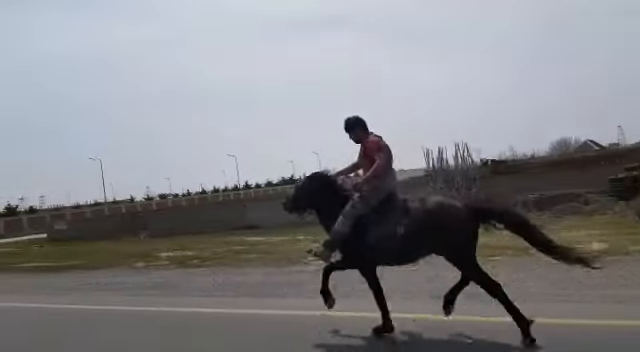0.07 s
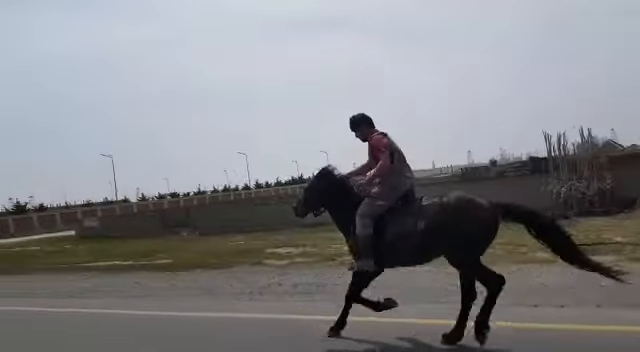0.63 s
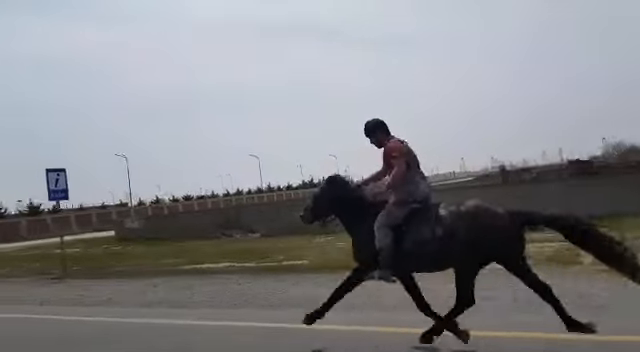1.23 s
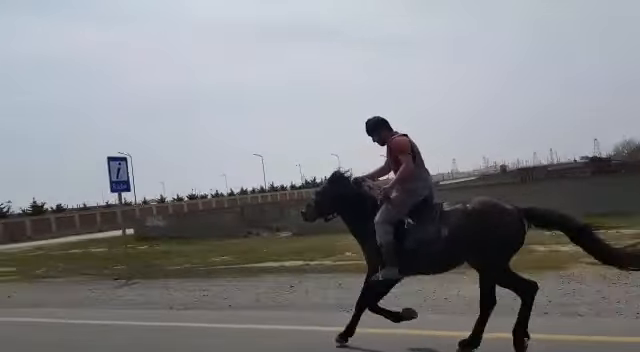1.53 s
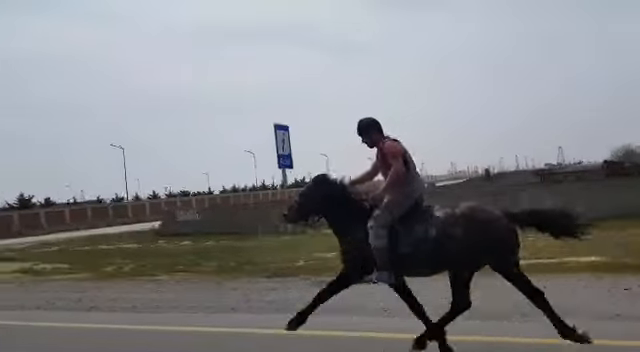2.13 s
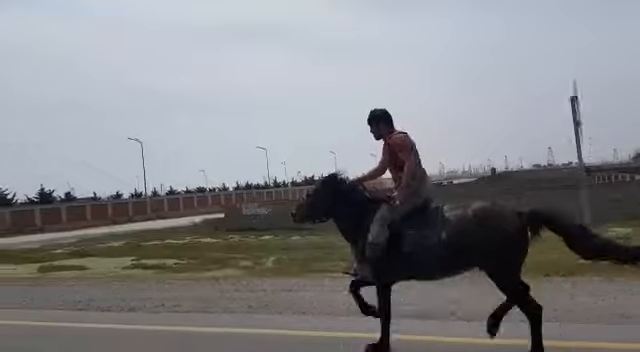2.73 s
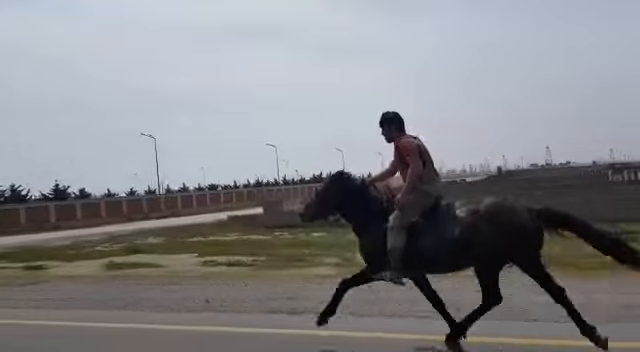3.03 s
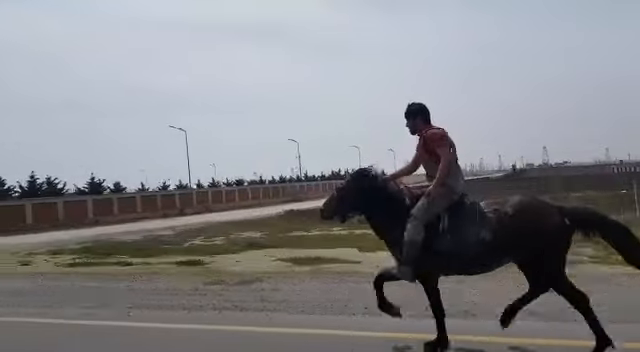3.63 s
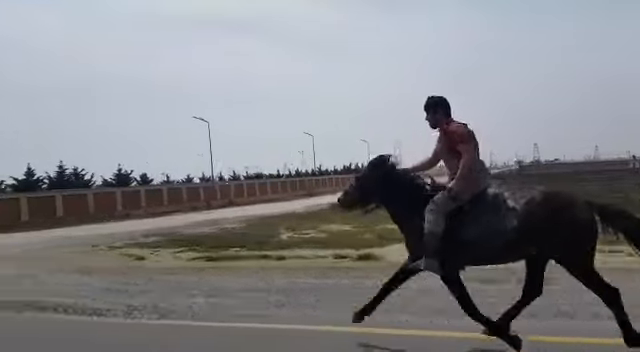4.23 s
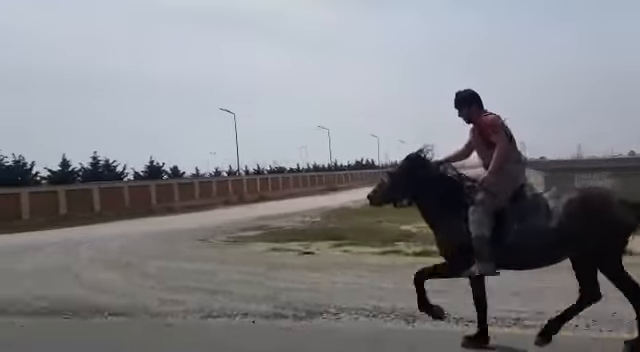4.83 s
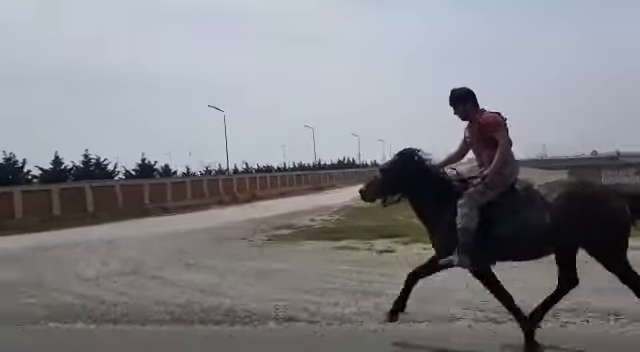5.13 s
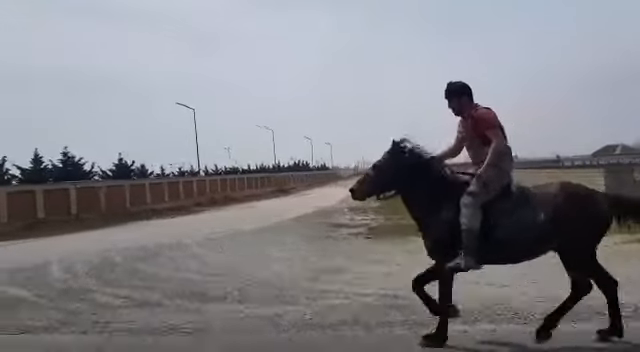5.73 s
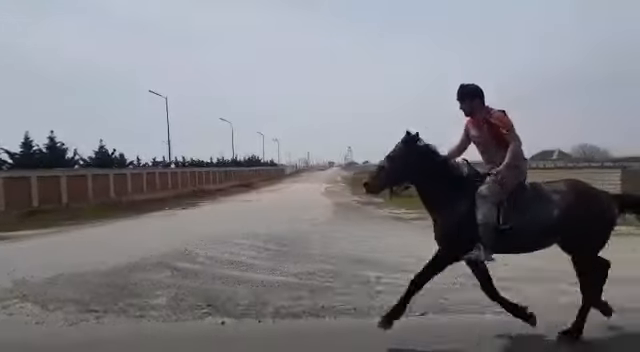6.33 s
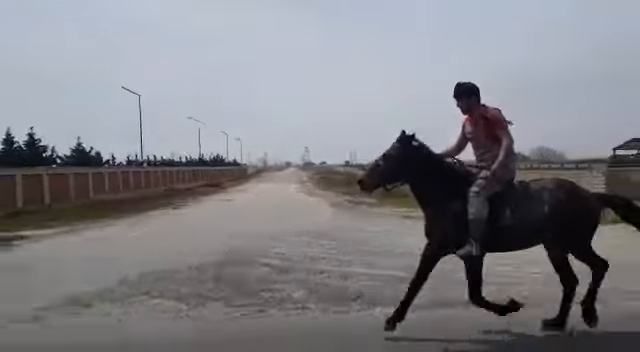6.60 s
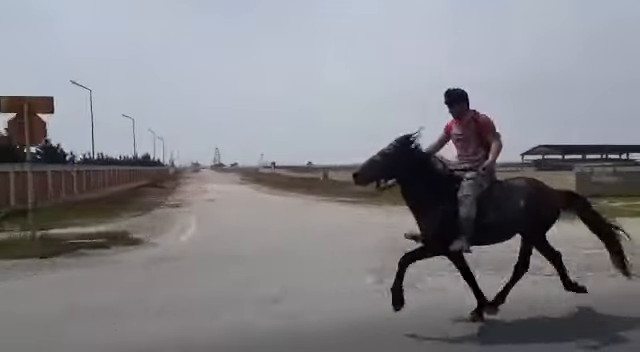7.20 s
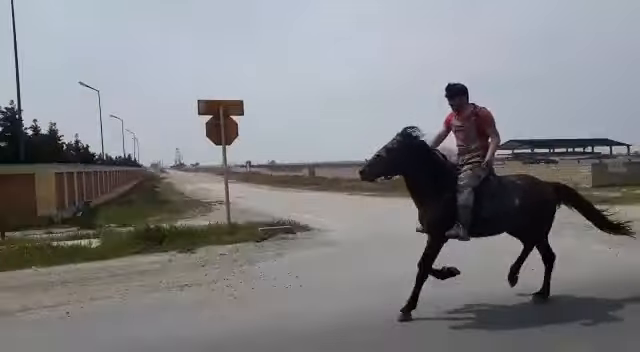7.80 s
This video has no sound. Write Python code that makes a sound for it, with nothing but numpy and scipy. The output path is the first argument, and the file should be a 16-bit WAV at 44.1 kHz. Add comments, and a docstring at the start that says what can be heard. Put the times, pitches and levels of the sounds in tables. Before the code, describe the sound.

Wind buffets the microphone of a moving vehicle while a horse's hooves clack quickly along a hard road beside it.

```python
"""A trotting horse in the wind

A horse trots fast on asphalt, heard from a vehicle that keeps pace beside it. Its hooves land in
diagonal pairs, each with a clack and a gritty scrape; some skid or clink on a stone. Rushing air hits
the microphone's two openings (ports) in gusts, swirls and short rasps. Underneath, the tyres hiss."""
import sys
import numpy as np
from scipy import signal
from scipy.fft import rfft, irfft, next_fast_len
from scipy.io import wavfile
from scipy.ndimage import map_coordinates

SR = 44100
rng = np.random.default_rng(int(sys.argv[2]) if len(sys.argv) > 2 else 0)


def dump_mix(stems):
    """Bounce the given channels to the path in sys.argv[1] as a 16-bit WAV at rate SR."""
    frames = np.atleast_2d(stems).T  # one column per channel
    limited = np.clip(frames, -1, 1)  # hard clip at full scale
    pcm = np.round(limited * 32767).astype(np.int16)
    wavfile.write(sys.argv[1], SR, pcm)


N = 351036
TIME = np.arange(N) / SR
PORT_LEAD_S = 0.000776  # the left port hears the horse first
SHELTER_DB = -6.5  # the right port is sheltered from buffets and the strongest rasps


def amp(db):
    """Turn decibels into a gain."""
    return 10 ** (np.asarray(db) / 20)

def unit(x):
    """Scale to an average power of 1."""
    return x / np.sqrt(np.mean(x ** 2) + 1e-20)

def curve(rows):
    """Join (time, value) points with straight lines."""
    return np.interp(TIME, *np.transpose(rows))

def add(track, s, sound):
    """Mix a sound into a track, starting at s seconds."""
    track[..., round(s * SR):][..., :sound.shape[-1]] += sound

def fade(t, fade_s):
    """A gain that falls by 60 dB every fade_s seconds."""
    return amp(-60 * t / fade_s)

def ping(hz, fade_s, t):
    """A pure tone that dies away."""
    return np.sin(2 * np.pi * hz * t) * fade(t, fade_s)

def wobble(rate):
    """A smooth curve through `rate` random values a second."""
    return map_coordinates(rng.standard_normal(int(N * rate / SR) + 4), [TIME * rate])

def per_port(rate):
    """A separate wobble for each port."""
    return np.array([wobble(rate), wobble(rate)])

def surge(rate):
    """A wobble for each port, with deep dips and gentle peaks."""
    w = per_port(rate)
    return np.where(w > 0, np.tanh(w), w)

def jitter(count, rate):
    """Samples that jump to a new random value about `rate` times a second."""
    return np.repeat(rng.standard_normal(count), SR // rate)[:count]

def burst(swell_s, rough_db):
    """Ragged noise that swells and dies away."""
    age = np.arange(SR // 6) / SR / swell_s
    ragged = amp(rough_db * np.clip(jitter(len(age), 1500), -2, 1.5))
    return age * np.exp(1 - age) * unit(rng.standard_normal(len(age)) * ragged)

def pops(rate, spread_db):
    """Random clicks of uneven size at each port."""
    hit = rng.random((2, N)) < rate / SR
    return unit(hit * rng.standard_normal((2, N)) * amp(spread_db * rng.uniform(-0.75, 1, (2, N))))

def grains(rate, hz, scatter, cycles, spread_db):
    """A loose stream of tiny tones at each port, each with its own pitch and size."""
    count = int(2 * N * rate / SR)
    late, phase = rng.random((count, 2)).T[..., None]
    pitch, size = np.clip(rng.standard_normal((count, 2)), -2, 2).T[..., None]
    grain_hz = hz * np.exp(scatter * pitch)
    samples = np.arange(int(cycles * SR / grain_hz.min()))
    turns = samples * grain_hz / SR
    swell = np.sin(np.pi * np.minimum(turns / cycles, 1)) ** 2
    wave = amp(spread_db * size) * swell * np.sin(2 * np.pi * (turns + phase))
    start = ((np.arange(count)[:, None] + 2 * late) * SR / rate).astype(int)
    places = (start + samples) % (2 * N)
    return unit(np.bincount(places.ravel(), wave.ravel(), 2 * N).reshape(2, N))

def filtered(x, response):
    """Pass x through a filter, given as a function of frequency."""
    size = next_fast_len(N + 8192, real=True)
    return irfft(rfft(x, size) * response(np.fft.rfftfreq(size, 1 / SR)), size)[..., :N]

def colour(points):
    """A filter that shapes the tone along (frequency, level) points."""
    def response(hz):
        point_hz, db = np.transpose(points)
        gain = unit(amp(np.interp(np.log(hz + 1), np.log(point_hz), db)))
        cepstrum = irfft(np.log(gain + 1e-6))
        half = len(cepstrum) // 2
        cepstrum[1:half] *= 2  # folded so the filter rings after a hit, never before
        cepstrum[half + 1:] = 0
        return np.exp(rfft(cepstrum))
    return response


# How loud the tyres are: (time [s], level [dB])
TYRE_LEVEL = [(0, -76), (1.1, -59.5), (1.6, -78), (3, -73), (3.85, -65.5), (4.25, -64), (6.1, -58.5),
              (6.75, -68.5), (7.2, -58.5), (7.65, -63.5), (7.96, -53)]
# Tone of their hiss: (frequency [Hz], level [dB])
TYRE_TONE = [(60, 30), (300, 10), (800, 27), (1600, 21), (3000, 10), (4800, 2.5), (6600, 1), (8100, -9),
             (9500, -8), (11300, -3), (15500, -6)]
def tyres():
    """Tyres hiss on the asphalt while sand crackles under them."""
    level_db = curve(TYRE_LEVEL)
    rolling = rng.standard_normal((2, N)) * amp(2.6 * per_port(32) + 1.1 * per_port(900))
    hiss = unit(filtered(rolling, colour(TYRE_TONE)))
    sand = grains(rate=420, hz=2500, scatter=0.34, cycles=2.5, spread_db=-1.5)
    return amp(level_db + 20) * hiss + amp(level_db - 13.5) * sand


# Gusts of air: (time [s], strength [dB])
GUSTS = [(0.0, -22.5), (0.08, -17), (0.19, -16), (0.39, -20.5), (0.48, -13.5), (0.55, -19), (0.64, -29.5),
         (0.69, -21.5), (0.8, -14.5), (0.89, -15), (1.0, -15), (1.13, -14), (1.28, -18), (1.34, -16.5),
         (1.42, -14.5), (1.5, -20), (1.56, -17.5), (1.67, -21), (1.75, -16.5), (1.93, -17), (1.98, -20.5),
         (2.04, -17), (2.085, -18), (2.12, -17.5), (2.28, -14.5), (2.33, -20), (2.39, -15.5), (2.84, -17),
         (3.05, -19), (3.33, -24), (3.38, -19), (3.46, -18.5), (3.5, -26.5), (3.54, -21), (3.7, -19),
         (3.76, -23), (4.53, -23.5), (4.59, -29.5), (4.65, -23.5), (4.8, -28), (4.88, -27), (4.97, -24),
         (5.07, -21), (5.12, -28.5), (5.15, -26), (5.3, -24), (5.33, -29.5), (5.43, -19.5), (5.54, -28),
         (5.66, -21.5), (5.87, -23.5), (6.21, -25), (6.29, -24.5), (6.48, -23.5), (6.63, -30),
         (6.72, -23.5), (6.75, -36), (6.81, -20.5), (6.85, -39), (6.87, -26.0), (7.02, -21.5), (7.05, -32),
         (7.17, -19), (7.2, -26.5), (7.29, -21), (7.39, -19.5), (7.41, -18), (7.53, -19.5), (7.56, -17.5),
         (7.68, -33), (7.81, -38), (7.87, -31.5), (7.96, -41.5)]
# Which port gets more wind: (time [s], left over right [dB])
WIND_SIDE = [(0, 0), (1.3, 2), (3.5, 1), (4.25, 7), (5.3, 0), (5.7, 7.5), (6.9, 4.5), (7.05, 4), (7.96, 3)]
def airstream():
    """Gust strength above a plain breeze, and how far the wind leans left, both in dB."""
    breeze_db = -21
    return curve(GUSTS) - breeze_db, curve(WIND_SIDE)


# How loud the rumble is, before gusts add to it: (time [s], level [dB])
RUMBLE_LEVEL = [(0.0, -30.5), (0.55, -29), (0.95, -33.5), (1.12, -31.5), (2.2, -31.5), (3.4, -32.5),
                (4.0, -36.5), (4.4, -37), (4.7, -41.5), (4.95, -31.5), (5.55, -33.5), (6.3, -35.5),
                (6.47, -31.5), (6.75, -35.5), (7.05, -30), (7.55, -28.5), (7.7, -36.5), (7.95, -44)]
# Faster air breaks into smaller swirls: (time [s], high roar over low roar [dB])
AIR_SPEED = [(0, -0.5), (3, 1.5), (4.6, -2.5), (6.5, -7), (7.96, -3.5)]
# Tones of the swirls, from biggest to smallest: (frequency [Hz], level [dB])
RUMBLE_TONE = [(12, -42.5), (28, -21), (42, -10), (70, -5.5), (120, -1.5), (180, -0.5), (230, -2.5),
               (330, -54), (600, -77)]
LOW_ROAR_TONE = [(110, -36), (180, -11), (240, 0.5), (370, 0), (520, -10), (750, -28), (1500, -64)]
HIGH_ROAR_TONE = [(250, -25), (450, 0.5), (560, 0), (730, -0.5), (900, -8), (1200, -25), (2500, -49),
                  (5000, -86)]
FLUTTER_TONE = [(300, -10), (700, 2.5), (1050, 6.5), (1700, -2), (2500, -6.5), (3300, -14), (4700, -25.5),
                (6200, -27), (7000, -37), (8000, -55), (9800, -55), (11500, -36.5), (13500, -55.5),
                (16000, -66)]
def wind():
    """Swirls of air break on each port: big ones rumble, middling ones roar, small ones flutter."""
    gust_db, left_db = airstream()
    speed_db = curve(AIR_SPEED)
    swell_db = 0.81 * wobble(14)  # brief swells within a gust
    puffs, swirls, spits = surge(45), surge(130), per_port(500)
    clicks = pops(rate=280, spread_db=-2.0)  # each is a thud and a crackle at once

    def air(tone, wobble_db, click_gain):
        noise = rng.standard_normal((2, N)) + click_gain * clicks
        return unit(filtered(noise * amp(wobble_db), colour(tone)))

    rumble = air(RUMBLE_TONE, 2.0 * wobble(12) + 1.6 * swirls, click_gain=0.18)
    rumble *= amp(curve(RUMBLE_LEVEL) + 3 + 0.078 * gust_db)
    low = air(LOW_ROAR_TONE, swell_db + puffs + 4.2 * swirls, click_gain=0.47)
    high = air(HIGH_ROAR_TONE, swell_db + 1.2 * puffs + 6.7 * swirls + 1.6 * spits, click_gain=0.44)
    blend = (low + amp(speed_db) * high) / np.hypot(1, amp(speed_db))
    hoots = grains(rate=55, hz=418.5, scatter=0.3263, cycles=6.1, spread_db=1.5)
    roar = amp(gust_db - 23.5) * (blend + amp(-2.5) * hoots)
    growth = 1.61  # dB per dB of gust: small swirls grow fastest
    flutter = air(FLUTTER_TONE, growth * swell_db + 2.5 * puffs + 4 * swirls + 2 * spits, click_gain=0.41)
    flutter *= amp(-35 + growth * gust_db + 0.052 * speed_db)
    return (rumble + roar + flutter) * amp(np.array([left_db, -left_db]) / 2)


# The strongest rasps of air: (time [s], level [dB], swell time [s])
STRONG_RASPS = [(0.075, -27, .002), (0.483, -15.5, .002), (0.518, -16.5, 0.0013), (0.716, -23, .002),
                (0.778, -32, 0.0016), (1.13, -16, 0.0029), (1.331, -19, .003), (1.41, -26, 0.0016),
                (1.517, -21.5, .002), (2.02, -18, 0.0024), (2.035, -23, 0.0018), (2.11, -18, 0.004),
                (2.12, -14, 0.0023), (2.201, -22, 0.0018), (2.543, -19.5, .002), (2.838, -20, 0.0023),
                (3.051, -22.5, 0.003), (3.098, -28, 0.0023), (3.238, -19.5, 0.0027), (3.535, -33, 0.0013)]
# Tone of a rasp: (frequency [Hz], level [dB])
RASP_TONE = [(200, -17), (400, 7.5), (700, 2), (1100, 5.5), (1700, -0.5), (2600, 0), (3400, -11),
             (4700, -24.5), (6200, -23), (7500, -46), (9500, -45), (11300, -33), (15000, -55)]
def rasps(per_second=34, usual_swell_s=0.002, spread_db=4.5):
    """Air tears hardest at the left port; lesser rasps hit either port at random, louder in a gust."""
    gust_db, left_db = airstream()
    tears = [(s, db + port * SHELTER_DB, swell_s, port)
             for s, db, swell_s in STRONG_RASPS for port in range(2)]
    for when, size, length, side in rng.random((int(per_second * N / SR), 4)):
        at, port = int(when * N), int(2 * side)
        db = -29.5 + 1.15 * gust_db[at] + spread_db * (2 * size - 1) + (0.5 - port) * left_db[at]
        tears.append((at / SR, db, usual_swell_s * 2 ** (2 * length - 1), port))
    track = np.zeros((2, N + SR))
    for s, db, swell_s, port in tears:
        add(track[port], s, amp(db) * burst(swell_s, rough_db=8.0))
    return filtered(track[:, :N], colour(RASP_TONE))


# Single hard swirls of air: (time [s], level [dB], pitch [Hz])
AIR_SLAPS = [(0.438, -8, 513), (0.473, -25, 480), (0.514, -9, 600), (0.714, -3.5, 840), (0.721, 1.5, 368),
             (0.78, -8, 410), (0.802, -5, 450), (0.837, -3.5, 626), (1.326, -9, 570), (1.388, -9.5, 435),
             (1.408, -10, 245), (1.746, -7, 440), (1.887, -6, 460), (2.11, -6, 460), (2.121, -5.5, 315),
             (2.761, -6.5, 462), (2.804, -6.5, 378), (3.052, -9.5, 500), (3.098, -19, 334),
             (3.29, -10, 282), (3.534, -7, 274), (4.864, -10.5, 263), (7.007, -6.5, 247), (7.16, -9, 280),
             (7.411, -8, 423)]
# Tone of their slap: (frequency [Hz], level [dB])
SLAP_TONE = [(60, -26), (200, 6.5), (450, 3), (750, 6), (1300, -13), (2500, -26), (4500, -45), (8000, -61)]
def buffets():
    """A hard swirl slaps the left port, spins briefly at its own pitch and only brushes the right."""
    t = np.arange(SR // 20) / SR
    slaps, spins = np.zeros((2, 2, N + SR))
    for s, db, hz in AIR_SLAPS:
        for port in range(2):
            slap = 0.24 * rng.standard_normal(len(t)) * fade(t, 0.017)  # its wake
            slap[SR // 1000 + port * SR // 2000] -= 1  # suction passes from port to port
            port_db = db + port * SHELTER_DB
            add(slaps[port], s, amp(port_db + 12) * slap)
            add(spins[port], s, amp(port_db - 1) * ping(hz, 13 / hz, t))
    return filtered(slaps[:, :N], colour(SLAP_TONE)) + spins[:, :N]


def roadside_echo(x, fade_s):
    """Sound scatters thinly off the vehicle and the edge of the road."""
    t = np.arange(SR // 3) / SR
    tail = rng.standard_normal((2, len(t))) * fade(t, fade_s) * (t > 0.004)
    return signal.fftconvolve(x, tail / np.linalg.norm(tail[0]), axes=1)[:, :N]


# Flung pebbles: (time [s], level [dB])
PEBBLE_TICKS = [(3.6396, -41), (3.9107, -32), (4.575, -32), (4.6314, -33), (5.061, -35.5), (5.753, -31),
                (5.786, -33), (5.847, -32), (5.893, -27), (6.085, -31)]
def pebbles():
    """Loose stones tick on the asphalt, each at a few pitches of its own."""
    t = np.arange(SR // 50) / SR
    track = np.zeros((2, N + SR))
    for s, db in PEBBLE_TICKS:
        hz = 4600 * np.exp(0.22 * rng.uniform(-5, 1, (2, 4, 1)))
        add(track, s, amp(db - 6.5) * ping(hz, 0.0086, t).sum(axis=1))
    return track[:, :N]


# A shoe meets a stone: (time [s], level [dB], pitch [Hz])
SHOE_CLINKS = [(4.333, -34, 5800), (4.7595, -24.5, 6400), (5.2435, -26, 6030), (5.657, -31.5, 6800),
               (7.059, -33, 6840), (7.121, -35, 6130)]
def clinks():
    """A steel shoe catches a stone and rings."""
    t = np.arange(SR // 20) / SR
    track = np.zeros((2, N + SR))
    for port, side in enumerate((1, -1)):
        for s, db, hz in SHOE_CLINKS:
            add(track[port], s - side * PORT_LEAD_S / 2, amp(db) * ping(hz, 0.024, t))
    return track[:, :N]


# A planted hoof drags: (time [s], level [dB], swell time [s])
HOOF_DRAGS = [(4.326, -29, 0.0098), (5.221, -24, 0.0029), (5.433, -30, 0.0058), (5.471, -31.5, 0.0047),
              (6.11, -28, .008), (6.166, -26, 0.0079), (6.226, -33.5, 0.011), (6.325, -33, 0.014),
              (6.404, -32, 0.0051), (6.461, -42, 0.0098), (6.553, -41, 0.0068), (6.638, -37, 0.0043)]
# Tone of a skid: (frequency [Hz], level [dB])
SKID_TONE = [(500, -16), (1200, 16), (2100, 5), (3000, 2.5), (4500, -10.5), (6300, -11.5), (7500, -29),
             (8500, -36), (11000, -36), (15500, -26)]
def skids():
    """Loose grit grinds under a dragging hoof."""
    track = np.zeros((2, N + SR))
    for port, side in enumerate((1, -1)):
        for s, db, swell_s in HOOF_DRAGS:
            add(track[port], s - side * PORT_LEAD_S / 2, amp(db + side) * burst(swell_s, rough_db=5))
    return filtered(track[:, :N], colour(SKID_TONE))


# The trot, one diagonal pair of hooves a row: (time [s], second hoof's delay [s], first level [dB],
# second level [dB], first hollowness [dB], second hollowness [dB], first pitch [Hz],
# second pitch [Hz], extra grit [dB])
TROT = [(0.2165, 0.016, -41, -37.5, -1, 6, 1480, 1370, -6.5),
        (0.4228, 0.016, -25, -33, -1, 1, 1480, 1380, -4),
        (0.668, 0.018, -26.5, -27, -5.5, -7, 1800, 1540, -6),
        (.91, 0.007, -25.5, -39, 0, 1, 1510, 1400, -3),
        (1.1415, 0.013, -28.5, -41.5, 1, 15.5, 1520, 1380, 2),
        (1.3252, 0.035, -39, -35, 13, 6, 1390, 1280, 1),
        (1.5932, 0.0053, -23, -59, 2, -4, 1890, 1400, -13.5),
        (1.789, 0.06, -32, -34, -1, -4, 1500, 1400, -7),
        (2.026, 0.0082, -26, -31, 0, -0.5, 2340, 1450, -4.5),
        (2.245, 0.015, -30, -39, 3, 7, 1500, 1430, -2),
        (2.48, 0.037, -33.5, -39.5, 9, 11.5, 1560, 1400, -1),
        (2.7141, 0.0099, -27.5, -34, 6, 1, 1520, 1400, -2.5),
        (2.9396, 0.024, -25, -30.5, 1, 8.5, 1560, 1456, -4),
        (3.172, 0.0098, -51, -53, -4, -2, 1500, 1400, 0), (3.3928, 0.025, -20, -29, 5, 4, 1780, 2450, 0),
        (3.8487, 0.025, -5.5, -13, -15, -15, 2320, 2400, -10.5),
        (4.056, 0.042, -29, -25, -4.5, -4.5, 1500, 1420, -5),
        (4.307, 0.018, -31.5, -18.5, 3.5, 0.5, 1510, 1880, 1),
        (4.503, .045, -25.5, -26.5, -1, -1.5, 1530, 2450, 1),
        (4.7585, 0.023, -6.5, -16.5, -11, 1.5, 1960, 1940, -1),
        (4.963, 0.049, -31.5, -27.5, -8, 0, 1420, 1120, 0),
        (5.2139, .029, -12.5, -23, 3, 1.5, 1940, 1290, 7),
        (5.415, .051, -22.5, -24.5, 2.5, -1, 1930, 2500, 4.5),
        (5.6555, 0.048, -29, -26, 7.5, 1, 1900, 1230, 0),
        (5.873, 0.076, -25.5, -33.5, -2, 0, 1390, 1210, -0.5),
        (6.105, 0.069, -24, -30.5, -2, -1.5, 2060, 1490, 1),
        (6.3056, 0.11, -16.5, -32, -2, 1.5, 1420, 1210, -2),
        (6.5691, 0.068, -44, -26.5, 4, -2.5, 1500, 1200, -1),
        (6.793, 0.088, -30.5, -23.5, -1, -6, 1520, 1160, -5.5),
        (7.056, 0.064, -28.5, -30.5, 3.5, -2.5, 1770, 1180, -2),
        (7.289, 0.091, -28.5, -37.5, 1, -2, 1190, 1370, -1.5),
        (7.591, 0.0064, -33, -57, -6.5, -6, 1500, 1400, -1.5),
        (7.771, 0.074, -38, -43, 0.5, 7.5, 2660, 1240, -1)]
# The first hoof skids in, the second lands flat and rings hollow:
# (knock boost [dB], base scrape time [s], left over right [dB])
HOOF_PAIR = [(2.5, 0.05, 1.5), (6, 0.045, 2.5)]
# Short, dry hoof taps on the road, between beats or on a landing: (time [s], level [dB])
DRY_TAPS = [(2.152, -27), (4.429, -32.5), (4.862, -31), (5.288, -38), (5.487, -32.5), (7.845, -26.5)]
STEP_DB = -23.5  # an ordinary step
def landings():
    """List every touch of a hoof on the road; a harder hoof stops sliding sooner."""
    for s, delay, db1, db2, hollow1, hollow2, hz1, hz2, extra_grit_db in TROT:
        pair = (s, db1, hollow1, hz1), (s + delay, db2, hollow2, hz2)
        for (at, db, hollow_db, hz), (boost_db, base_s, left_db) in zip(pair, HOOF_PAIR):
            force_db = db - STEP_DB
            grit_db = -49 + force_db + extra_grit_db
            scrape_s = base_s * np.exp(-0.18 * (force_db + hollow_db / 2))
            yield at, db, db + boost_db + hollow_db, hz, grit_db, scrape_s, left_db
    for s, db in DRY_TAPS:
        yield s, db, db + 5, 1400, -62, 0.01, 0


def sole(fade_s, ring_gain):
    """A blow and its short ring, different each time the hoof is set down."""
    t = np.arange(SR // 100) / SR
    response = rng.standard_normal(len(t)) * fade(t, fade_s)
    response *= ring_gain / np.linalg.norm(response)
    response[0] += 1
    return response / np.linalg.norm(response)


# Where the hoof wall and shoe ring: (frequency [Hz], width [Hz], level [dB])
WALL_PEAKS = [(850, 500, 1), (1460, 484, 4), (2250, 1140, 1.5)]
def hoof_wall(hz):
    """The hoof as a filter: it rings at a few broad peaks."""
    response = sum((-1) ** k * amp(db) * 1j * hz * width / (peak ** 2 - hz ** 2 + 1j * hz * width)
                   for k, (peak, width, db) in enumerate(WALL_PEAKS))
    response /= (1 + 1j * hz / 3000) ** 2  # hoof horn is soft: little treble
    return response / np.sqrt(np.mean(abs(response) ** 2))


# The hollow hoof's ring: (multiple of the landing's pitch, level [dB], fade time [s])
HOLLOW_RING = [(1, -4.5, 0.034), (1.65, -18, 0.068)]
# Tones of the clack, the grit and the scuffed dust: (frequency [Hz], level [dB])
CLACK_TONE = [(900, -13.5), (2000, -7.5), (3000, 9), (4200, 1.5), (4900, -4), (5800, -3.5), (7000, -24.5),
              (8200, -38), (12000, -58)]
GRIT_TONE = [(4500, -6), (5900, 9), (7200, 8.5), (8200, -3), (9500, 1), (11000, 2), (15500, -5)]
SCUFF_TONE = [(7000, -49), (9800, -8), (11200, -4), (12800, -20), (16000, -23)]
def hooves():
    """Each hoof grazes the road, slams flat, rings, grinds over the grit and scuffs the dust."""
    t = np.arange(-SR // 12, SR // 4) / SR  # the hoof lands at t = 0
    before, after = np.maximum(-t, 0), np.maximum(t, 0)
    settle = 1 + 0.8 * (t >= 0) * fade(after, 0.025)
    scuff = amp(-70.5) * np.exp(-np.abs(t - 0.008) / 0.012)
    forces, rings = np.zeros((4, 2, N + SR)), np.zeros((2, N + SR))
    for s, db, knock_db, hz, grit_db, scrape_s, left_db in landings():
        force_db = db - STEP_DB
        graze = fade(before, 0.029 * np.exp(-0.2 * force_db))  # a light hoof brushes for longer
        blow = (t == 0) * amp(0.14 * force_db)  # one sharp impact reaches both ports
        scrape = graze * settle * fade(after, max(scrape_s, 0.01))
        body = sole(fade_s=0.0074, ring_gain=0.42)
        clop = sum(amp(knock_db + ring_db) * ping(hz * ratio, fade_s, after)
                   for ratio, ring_db, fade_s in HOLLOW_RING)
        shoe_hz = 5200 * np.exp(0.08 * rng.standard_normal())
        shoe = amp(db - 19.5) * ping(shoe_hz, 0.016, after)
        for port, side in enumerate((1, -1)):
            crunch = amp(8.3 * jitter(len(t), 2000))  # crushed grains make the force spiky
            rub = rng.standard_normal(len(t)) * crunch
            knock = amp(knock_db - 15.5) * (scrape * rub + 30 * blow)
            clack = amp(db - 26.5) * (scrape * rub + 28 * blow)
            grit = amp(grit_db) * (scrape * rub + 13 * blow)
            contact = signal.fftconvolve([knock, clack, grit, scuff * rub], body[None], axes=1)
            start_s = s + 0.0018 - side * PORT_LEAD_S / 2 + t[0]
            gain = amp(side * left_db / 2)
            add(forces[:, port], start_s, gain * contact)
            add(rings[port], start_s, gain * (clop + shoe))
    tones = hoof_wall, colour(CLACK_TONE), colour(GRIT_TONE), colour(SCUFF_TONE)
    return rings[:, :N] + sum(filtered(force[:, :N], tone) for force, tone in zip(forces, tones))


def scene():
    """Hoofbeats and their echo, mixed with the wind and the tyres."""
    horse = hooves() + pebbles() + skids() + clinks()
    echo = amp(-8.0) * roadside_echo(horse, fade_s=0.049)
    return horse + echo + wind() + buffets() + rasps() + tyres()


def record(dry):
    """The microphone rounds off the strongest buffets and loses the very highest treble."""
    rounded = dry / (1 + dry ** 4) ** (1 / 4)
    return filtered(rounded, lambda hz: hz < 15850)


dry = scene()
out = record(dry)
dump_mix(out)
```